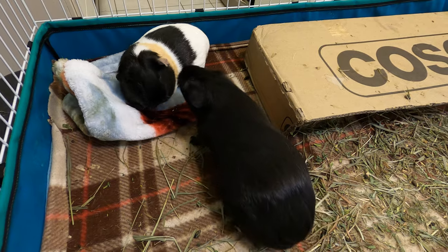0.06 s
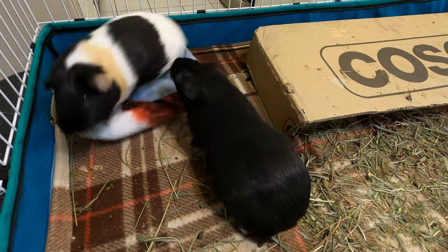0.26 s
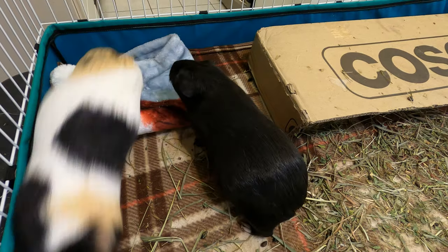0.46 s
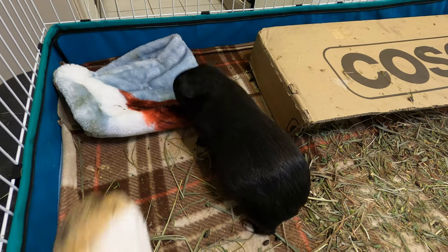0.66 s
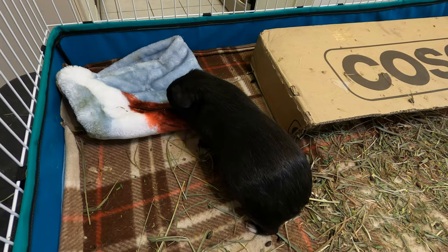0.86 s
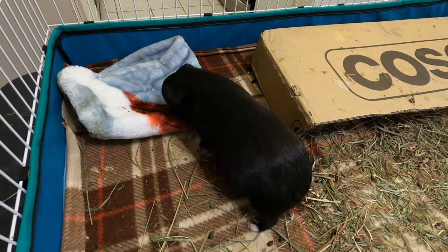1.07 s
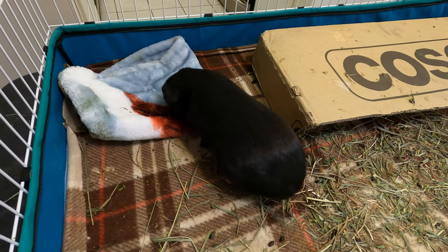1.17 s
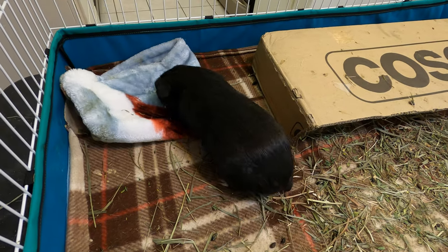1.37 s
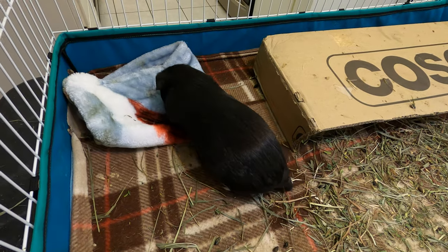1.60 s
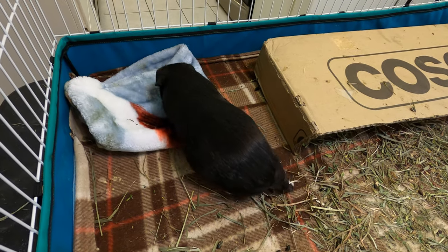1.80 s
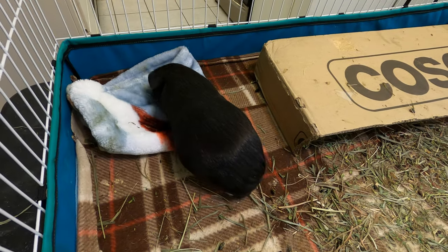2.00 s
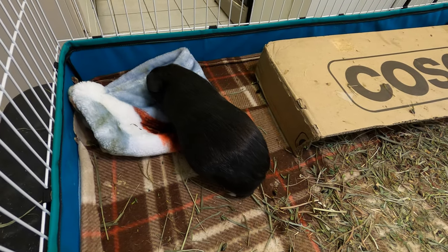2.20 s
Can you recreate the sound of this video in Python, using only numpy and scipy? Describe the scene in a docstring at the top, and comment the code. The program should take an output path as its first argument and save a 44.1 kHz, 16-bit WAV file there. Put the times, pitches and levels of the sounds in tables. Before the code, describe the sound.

A guinea pig gives four short rising squeaks close by, the first the highest. Another bolts past, thumping the fleece-lined floor and bumping the pen. Then hay rustles and ticks faintly in a small, quiet room.

```python
"""Guinea pigs in a fleece-lined pen

A guinea pig gives four short rising squeaks close by, its voice shaped by its throat and mouth.
One animal bolts past: it thumps the springy floor, knocks the pen and scuffs the fleece. Another
shuffles on, so that hay rustles and single stalks tick. The small room adds a hush and a short echo."""
import sys
import numpy as np
from scipy import signal
from scipy.fft import rfft, irfft
from scipy.io import wavfile
from scipy.ndimage import uniform_filter1d

SR = 44100
rng = np.random.default_rng(int(sys.argv[2]) if len(sys.argv) > 2 else 0)


def unload_wav(signal):
    """Save mono or channel-first audio to the path in sys.argv[1] as 16-bit WAV at rate SR, clipped to [-1, 1]."""
    wavfile.write(
        sys.argv[1],
        SR,
        np.round(np.clip(np.atleast_2d(signal).T, -1, 1) * 32767).astype(np.int16),
    )


N = 99225
T = np.arange(N) / SR
TOP_HZ = 15400


def undb(db):
    """Turn decibels into a number to multiply by."""
    return 10 ** (np.asarray(db) / 20)


def unit(x):
    """Scale a sound to an average (rms) level of 1."""
    return x / np.sqrt(np.mean(x ** 2))


def gain_at(hz, points):
    """Look up how strong a frequency is in a table of Hz and dB."""
    f, db = np.array(points, float).T
    return undb(np.interp(np.log(hz + 1e-3), np.log(f), db))


def colour(x, points):
    """Shape the bass and treble by a table of Hz and dB."""
    hz = np.arange(N + 1) * SR / (2 * N)
    return irfft(rfft(x, 2 * N) * gain_at(hz, points))[..., :N]


def noise(points):
    """Noise of level 1, shaped by a table of Hz and dB."""
    return unit(colour(rng.standard_normal(N), points))


def noise_band(points, hz, q):
    """Shaped noise gathered around one frequency; a higher q is narrower."""
    return unit(signal.lfilter(*signal.iirpeak(hz, q, fs=SR), noise(points)))


def wobble(per_second):
    """A smooth random wander, about 1 in size."""
    hold = int(SR / per_second)
    steps = np.repeat(rng.standard_normal(N // hold + 1), hold)
    return unit(uniform_filter1d(steps, hold)[:N])


def fade(seconds):
    """Die away by 60 dB in this time, called the fade time."""
    return np.exp(-np.log(1000) * T / seconds)


def rise(seconds):
    """Swell from silence, about two thirds of the way in this time."""
    return 1 - np.exp(-T / seconds)


def at(x, start):
    """Delay a sound to its start time."""
    return np.pad(x, (max(int(start * SR), 0), 0))[:N]


def pan(x, db):
    """Make the left side this many dB louder than the right."""
    return x * undb(np.array([[db], [-db]]) / 2)


def from_direction(x, table):
    """A sound from one side reaches the two ears at different strengths and times."""
    f, db, lead = np.array(table, float).T
    log_hz = np.log(np.arange(N + 1) * SR / (2 * N) + 1e-3)
    left = undb(np.interp(log_hz, np.log(f), db) / 2) * np.exp(1j * np.interp(log_hz, np.log(f), lead) / 2)
    return irfft(rfft(x, 2 * N) * np.array([left, 1 / left]))[:, :N]


# The room's hush. Each row: frequency in Hz, level in dB.
HUSH_COLOUR = [(25, -0.5), (40, -18), (66, -17.5), (105, -23), (150, -6), (235, -8.5), (320, -11),
               (460, -14.5), (790, -29), (1200, -20), (1700, -26), (5900, -39.5), (9000, -42.5),
               (15000, -57.5)]
# Where it comes from. Each row: frequency in Hz, left minus right in dB, left's head start in radians.
HUSH_DIRECTION = [(30, 3.3, -0.34), (150, -1.5, -1.17), (450, -6, -1.4), (1300, -1.5, -1.25),
                  (4400, 4.5, -1), (14000, -2.5, -0.61)]


def room_hush():
    """The quiet air of the room sounds wider in the treble than in the bass."""
    middle = noise(HUSH_COLOUR)
    side = 0.84 * signal.lfilter(*signal.butter(1, 3500, "high", fs=SR), noise(HUSH_COLOUR))
    return from_direction(undb(-53) * np.array([middle + side, middle - side]), HUSH_DIRECTION)


# The sound of dry hay. Each row: frequency in Hz, level in dB.
HAY_COLOUR = [(300, 11), (1200, 7.5), (2500, 4), (4000, -1), (8500, -2.5), (11000, -11.5), (15000, -21)]
# How strongly the animals stir the hay. Each row: time in seconds, level in dB.
RUSTLE_LEVELS = [(0, -59.5), (.14, -57), (.18, -53.5), (.205, -52), (.29, -52), (.335, -60.5), (.38, -56),
                 (.45, -59.5), (.71, -62.5), (.8, -63), (.87, -54.5), (.95, -92), (1.12, -65),
                 (1.18, -62.5), (1.235, -54), (1.28, -62.5), (1.36, -87), (1.41, -61.5), (1.55, -91),
                 (1.585, -59.5), (1.64, -74.5), (1.9, -68.5), (1.95, -58.5), (2.05, -70), (2.15, -58.5),
                 (2.25, -64)]


def hay_rustle(clicks_per_second=4000, spread_db=2.2, width=0.83):
    """Thousands of tiny clicks from shifting stalks blend into a crackle."""
    sizes = undb(spread_db * np.minimum(rng.exponential(size=(2, N)), 5))
    clicks = (rng.random((2, N)) < clicks_per_second / SR) * sizes * rng.standard_normal((2, N))
    middle, side = unit(colour(clicks, HAY_COLOUR))
    level = undb(np.interp(T, *np.array(RUSTLE_LEVELS).T) + 1.88 * wobble(55))
    return level * np.array([middle + width * side, middle - width * side])


# Single stalks. Each row: start in seconds, level in dB, centre in Hz, left minus right in dB.
STALK_TICKS = [(0.0896, -51, 8260, 0), (0.2005, -49, 4440, 0), (0.2687, -44.5, 4400, 1),
               (0.3713, -54, 6000, 3), (0.5383, -42.5, 10000, -2.5), (0.569, -55.5, 6550, -5),
               (0.596, -56, 5510, -5), (0.601, -58, 6570, -10), (0.6383, -55.5, 5880, 8),
               (0.6762, -48.5, 7000, -5), (0.707, -56, 7500, 5), (.839, -56, 5750, 18),
               (.8605, -50.5, 5020, 5), (0.8771, -48.5, 6700, 4), (1.0907, -54, 7850, 3),
               (1.1934, -53, 6950, -8), (1.216, -51, 9000, -9), (1.2458, -42.5, 4200, -4),
               (2.144, -53.5, 5940, 4), (2.1765, -54.5, 6400, 2)]


def hay_ticks():
    """A single stalk gives a brief, bright tick above the rustle."""
    out = np.zeros((2, N))
    for start, db, hz, side_db in STALK_TICKS:
        tick = undb(db) * noise_band(HAY_COLOUR, hz, q=1.5) * fade(0.017)
        out += pan(at(tick, start), side_db)
    return out


# Paws landing. Each row: start in seconds, thud level in dB, push length in seconds, rumble level in dB.
PAW_STEPS = [(0.091, -38.5, 0.0033, -41.5), (0.164, -35.5, 0.0036, -31), (.203, -18, 0.0014, -22.5),
             (.219, -22, 0.0035, -24), (0.273, -33, 0.0065, -22), (.366, -24, .004, -23.5),
             (.392, -26, 0.004, -23.5), (.428, -19, 0.0068, -22.5), (.481, -13, 0.0057, -24),
             (.513, -18.5, 0.0055, -29), (.541, -2, 0.0033, -24), (.572, -19, 0.0049, -21),
             (.604, -9.5, 0.005, -33.5), (.641, -6.5, .004, -11), (.680, -17, 0.0069, -15.5),
             (.722, -18, 0.0051, -18.5), (.752, -21, .005, -30.5), (0.789, -35.5, 0.0046, -26.5),
             (0.863, -51, 0.0029, -27.5), (0.893, -50, 0.0065, -28.5), (.918, -42, 0.0027, -47.5),
             (.955, -43.5, 0.0029, -56), (1.03, -47, 0.0055, -42), (1.14, -78, 0.0093, -36.5),
             (1.249, -29, 0.0052, -28.5), (1.274, -52, .006, -63), (1.327, -56, 0.0047, -42.5),
             (1.634, -64, .007, -51), (1.79, -59, 0.008, -48), (1.97, -58, .006, -49),
             (2.09, -32, 0.0053, -28), (2.127, -45, 0.0039, -50)]
# The notes the floor rings at. Each row: pitch in Hz, level in dB, fade time in seconds.
FLOOR_NOTES = [(54.8, -5, 0.07), (115.4, -13.5, 0.067), (153.8, -2.5, 0.078), (181.8, -4, .12),
               (210.8, -9, 0.1), (261.8, -5, .14), (319.4, -14.5, 0.19), (412, -12, 0.19)]
# The pen's loose parts rattling. Each row: frequency in Hz, level in dB.
RATTLE_COLOUR = [(40, -11.5), (90, -7.5), (125, 6), (250, -0.5), (330, -1), (420, -7), (700, -12.5),
                 (1500, -53), (4000, -68.5)]


def footfalls(rumble_hz=36.7):
    """Each step rings the pen floor and shakes its loose parts; a deep, soft rumble comes with it."""
    out = np.zeros(N)
    for start, db, push_s, rumble_db in PAW_STEPS:
        detune = 1 + 0.015 * rng.standard_normal(len(FLOOR_NOTES) + 1)
        ring = -sum(undb(note_db) * fade(fade_s) * np.sin(2 * np.pi * hz * shift * T)
                    for (hz, note_db, fade_s), shift in zip(FLOOR_NOTES, detune))
        rattle = undb(-9.5) * noise(RATTLE_COLOUR) * fade(0.37)
        push = np.sin(np.pi * T[T < push_s] / push_s)  # a longer push makes a duller thud
        thud = signal.fftconvolve((ring + rattle) * rise(0.002), push)[:N]
        rumble = np.sin(2 * np.pi * rumble_hz * detune[-1] * T) * fade(0.19) * rise(0.0098)
        out += at(undb(db) * thud / np.abs(thud).max(), start)
        out += at(undb(rumble_db) * rumble / np.abs(rumble).max(), start)
    return out


# Bumps against the pen. Each row: start in seconds, level in dB, pitch in Hz, fade time in seconds.
PEN_KNOCKS = [(.2015, -20, 415, .07), (.640, -24, 650, .04), (.863, -44, 295, .2)]


def knocks():
    """A body bumps the pen, which rings with one short, hollow note."""
    return sum(at(undb(db) * np.sin(2 * np.pi * hz * T) * fade(fade_s) * rise(0.0012), start)
               for start, db, hz, fade_s in PEN_KNOCKS)


# Paws on fleece. Each row: start in seconds, level in dB, fade time in seconds, centre in Hz.
PAW_SCUFFS = [(.202, -29.5, 0.13, 503), (.372, -32.5, 0.073, 1100), (.541, -33, 0.069, 700),
              (.571, -41.5, .03, 700), (0.6379, -30, .03, 1000), (0.68, -37, 0.045, 1200),
              (.861, -48, 0.039, 1900), (1.246, -55, 0.056, 1400)]
# The sound of rubbed fleece. Each row: frequency in Hz, level in dB.
FLEECE_COLOUR = [(150, -7), (500, -1), (1200, -4.5), (2600, -5), (3600, -13.5), (7000, -20), (10000, -22),
                 (12500, -39.5)]


def scuffs():
    """Paws catch and rub the fleece in short, dull bursts of noise."""
    return sum(at(undb(db) * noise_band(FLEECE_COLOUR, hz, q=1) * fade(fade_s) * rise(0.00097), start)
               for start, db, fade_s, hz in PAW_SCUFFS)


# One list per squeak, a held note that then climbs.
# Each row: time in seconds, pitch in Hz, level in dB, strength of the overtones in dB.
SQUEAK_SHAPES = [
    [(.2305, 752, -38, 0), (.24, 749.3, -37.5, 0), (.265, 757.6, -31.5, -2.5), (.276, 822, -37, 1),
     (.283, 1040, -31.5, -1), (.288, 1240, -24, -7.5), (.293, 1544, -24.5, -6), (.298, 2347, -16, -14.5),
     (.302, 2746, -25, -8), (.307, 2970, -40, 3), (.314, 2840, -32, -10), (.324, 2640, -32, -16)],
    [(.570, 695, -29.5, -15), (.585, 652, -28.5, -16.5), (.601, 658, -29, -20), (.615, 721, -33, -14.5),
     (.624, 806, -34.5, -10), (.633, 986, -37.5, -12), (.641, 1027, -39.5, -3.5)],
    [(.860, 710, -47, -4.5), (.877, 721, -38.5, -18.5), (.893, 797, -38.5, -12), (.905, 978, -37.5, -22),
     (.913, 1072, -37, -6.5), (.919, 1020, -46, -23)],
    [(1.137, 682.4, -51, -29), (1.145, 696, -41, -21), (1.158, 704, -39.5, -26), (1.173, 791, -42, -24),
     (1.183, 779, -47, -26), (1.189, 777, -68, -24), (1.198, 810, -50, -22), (1.211, 820, -69, -22)],
]
# How the throat and mouth boost or soften the voice. Each row: frequency in Hz, level in dB.
THROAT_COLOUR = [(650, 0), (1000, -1), (1480, 4), (2200, -3), (3000, -1), (3350, -22), (4500, -33),
                 (6000, -25), (9000, -29), (13000, -48)]


def squeaks(pitch_wobble=0.006, level_wobble_db=1.2, rasp_db=-25.5):
    """A clean voice slides in pitch while the throat shapes its tone and a little rasp rides on top."""
    out = np.zeros(N)
    for squeak in SQUEAK_SHAPES:
        times, hz, db, overtones_db = np.array(squeak).T
        pitch = uniform_filter1d(np.interp(T, times, hz), size=130) * (1 + pitch_wobble * wobble(400))
        phase = 2 * np.pi * np.cumsum(pitch) / SR
        richness_db = np.interp(T, times, overtones_db)
        voice = gain_at(pitch, THROAT_COLOUR) * np.sin(phase)
        for k in range(2, 7):  # overtones sit at 2 to 6 times the pitch
            strength = undb(richness_db * np.log2(k) ** 0.49) * gain_at(k * pitch, THROAT_COLOUR)
            voice += strength * np.sin(k * phase) * (k * pitch < TOP_HZ)
        voice += undb(rasp_db) * noise(THROAT_COLOUR) * (1 + np.cos(phase))
        on_off = np.clip((T - times[0]) / 0.002, 0, 1) * np.clip((times[-1] - T) / 0.0022 + 0.5, 0, 1)
        level = undb(np.interp(T, times, db) + level_wobble_db * wobble(200))
        out += on_off * level * voice
    return out


# What the walls send back. Each row: frequency in Hz, level in dB.
ECHO_COLOUR = [(100, -8), (600, -3), (1200, 0), (2800, 0), (5000, -5), (12000, -9)]


def wall_echo(x, fade_s=0.42, delay_s=0.005):
    """The walls answer with a short, blurred echo, different in each ear."""
    decay = fade(fade_s) / np.sqrt(np.sum(fade(fade_s) ** 2))
    left, right, shared = colour(rng.standard_normal((3, N)), ECHO_COLOUR) * decay
    return np.array([at(signal.fftconvolve(x.mean(axis=0), (shared + ear) / np.sqrt(2))[:N], delay_s)
                     for ear in (left, right)])


# Where the animals are. Each row: frequency in Hz, left minus right in dB, left's head start in radians.
ANIMAL_DIRECTION = [(30, 2.4, 0), (151, 0.43, -0.064), (400, 1.5, -0.34), (700, 3, -.25),
                    (1300, 2.5, -0.16), (2470, 6.5, -1.15), (4200, -0.5, -0.54), (8000, -.5, -.2)]


def scene():
    """Mix the animals, the hay and the room; the footfalls and the hush get no echo."""
    animals = from_direction(squeaks() + scuffs() + knocks(), ANIMAL_DIRECTION)
    hay = pan(hay_ticks() + hay_rustle(), db=-1)
    echo = undb(-10) * pan(wall_echo(animals + hay), db=2.5)
    floor = from_direction(footfalls(), ANIMAL_DIRECTION)
    return animals + hay + echo + floor + room_hush()


def record(dry):
    """Cut away the very highest treble."""
    return signal.sosfilt(signal.ellip(8, 0.2, 70, TOP_HZ, fs=SR, output="sos"), dry)


dry = scene()
out = record(dry)
unload_wav(out)
```